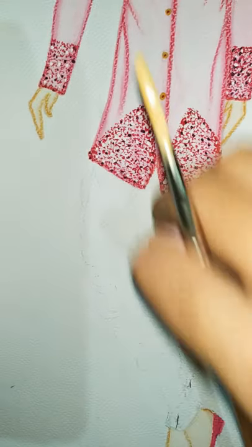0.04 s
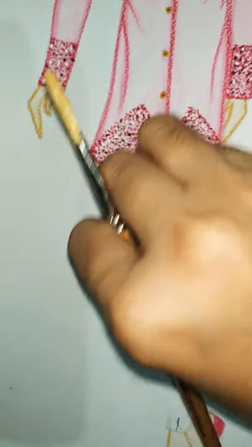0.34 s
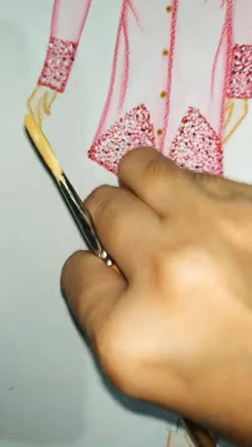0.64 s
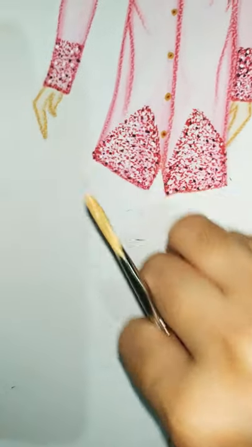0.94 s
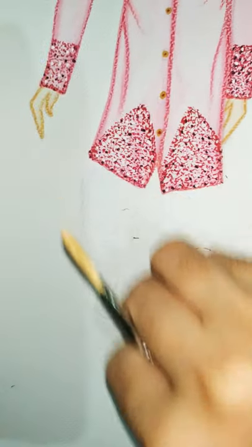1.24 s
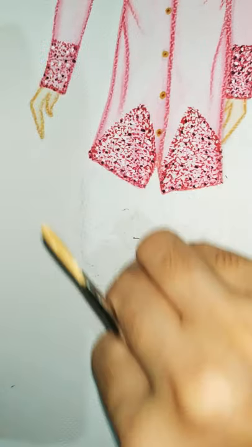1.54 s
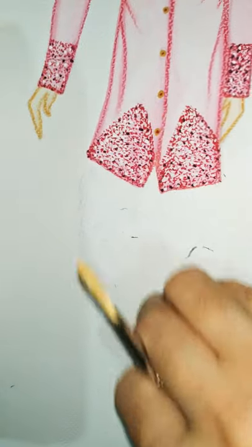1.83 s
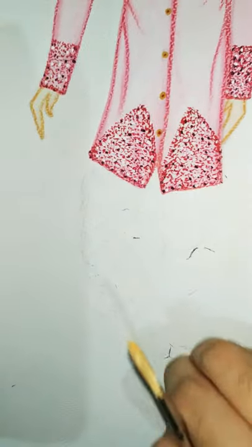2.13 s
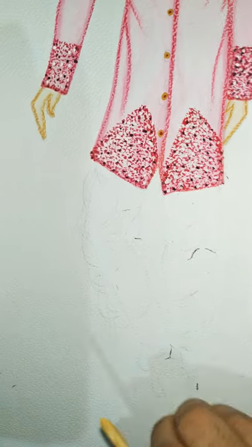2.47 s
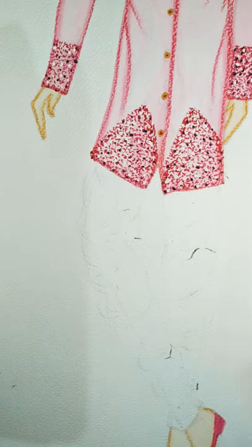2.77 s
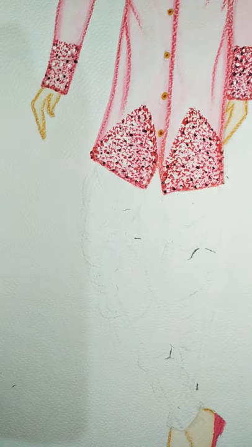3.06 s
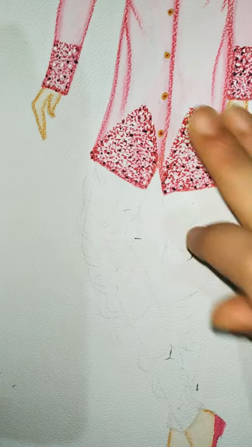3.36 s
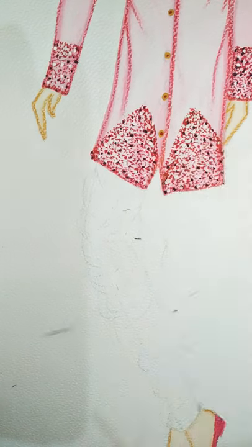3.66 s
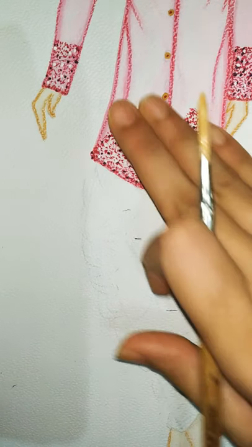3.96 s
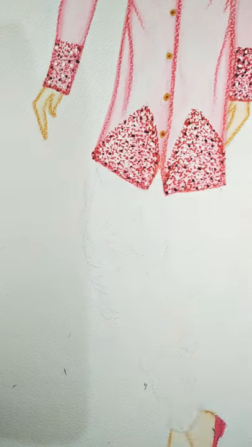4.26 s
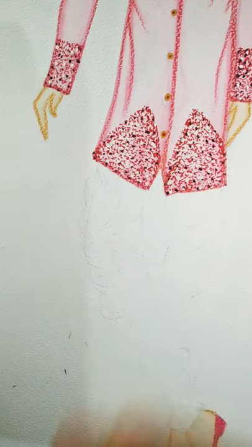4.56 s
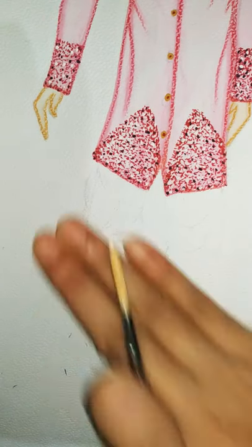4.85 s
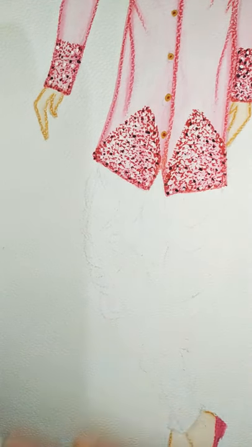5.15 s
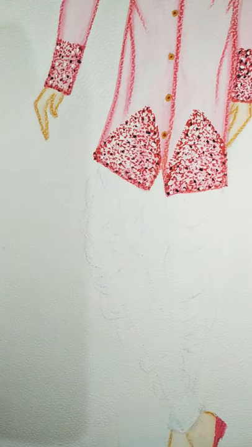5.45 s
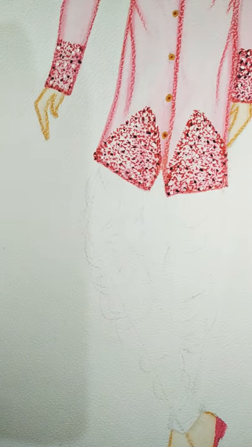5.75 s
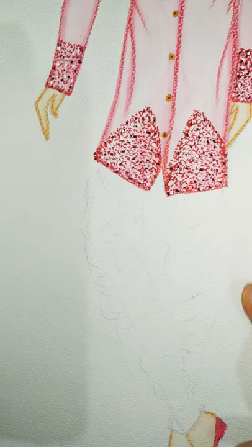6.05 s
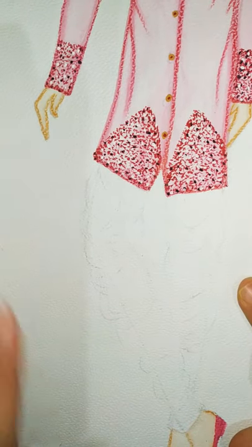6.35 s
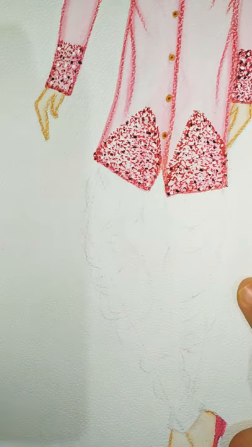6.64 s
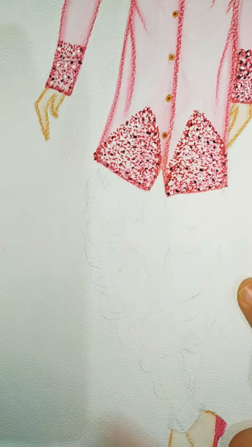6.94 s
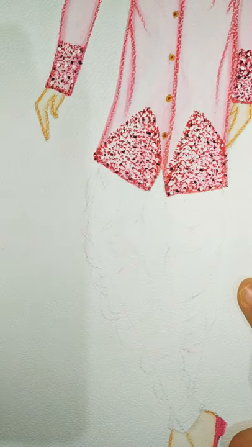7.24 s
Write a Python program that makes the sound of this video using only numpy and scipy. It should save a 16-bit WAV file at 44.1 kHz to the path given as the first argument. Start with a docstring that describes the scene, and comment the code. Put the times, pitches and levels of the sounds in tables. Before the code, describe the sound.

Close up at a desk in a small room, a small dry paintbrush flicks over paper, whispering on light strokes and scraping on harder ones. Fingers then wipe the sheet in eight quick, louder swishes, landing with soft bumps. Toward the end the hand slides and knocks, making the desk ring briefly. Dry ticks come and go over a low rumble and faint, wavering tones.

```python
"""At a desk in a small room, close up: a small dry paintbrush flicks crumbs off a drawing.
Its bristles whisper on light strokes and scrape on hard ones. Then fingers wipe the sheet in eight
quick swishes of skin on paper, landing with soft bumps; the hand slides and knocks, ringing the desk.
Brush and paper give off dry ticks. The room rings briefly over a low rumble and faint, wavering tones."""
import sys
import numpy as np
from scipy import signal
from scipy.fft import rfft, irfft, next_fast_len
from scipy.io import wavfile
from scipy.ndimage import map_coordinates

SR = 44100
rng = np.random.default_rng(int(sys.argv[2]) if len(sys.argv) > 2 else 0)


def inscribe(sig):
    """Save sig as 16-bit PCM at rate SR to the path in sys.argv[1].

    A 1-D sig is mono; a 2-D sig holds one channel per row.
    Samples are clipped to [-1, 1] before scaling.
    """
    pcm = np.round(np.clip(np.atleast_2d(sig).T, -1, 1) * 32767)
    wavfile.write(sys.argv[1], SR, pcm.astype(np.int16))


N = 330750  # 7.5 s


def amp(db):
    """Decibels to gain."""
    return 10 ** (np.asarray(db) / 20)


def unit(x):
    """Scale to rms 1."""
    return x / np.sqrt(np.mean(x ** 2) + 1e-20)


def along(points, hz):
    """Read a curve of (f/Hz, value) points on a log frequency axis."""
    f, value = np.transpose(points)
    return np.interp(np.log(hz + 1), np.log(f + 1), value)


def wobble(rate):
    """Smooth random modulation, with rate knots a second."""
    knots = rng.standard_normal(int(N * rate / SR) + 4)
    return map_coordinates(knots, [np.arange(N) * rate / SR])


def arch(length):
    """A half-sine swell from 0 to 1 and back over length seconds."""
    return np.abs(np.sin(np.linspace(0, np.pi, max(int(length * SR), 8))))


def filtered(x, response):
    """Zero-phase EQ; response gives the gain at each frequency."""
    size = next_fast_len(len(x) + SR // 4)
    return irfft(rfft(x, size) * response(np.fft.rfftfreq(size, 1 / SR)), size)[:len(x)]


def coloured(x, eq):
    """Shape x with an EQ curve and scale it to rms 1."""
    return unit(filtered(x, lambda hz: amp(along(eq, hz))))


def add(track, s, sound):
    """Mix a sound into the track at s seconds."""
    span = track[round(s * SR):][:len(sound)]
    span += sound[:len(span)]


# EQ of the room tone's low, mid and high layers: f/Hz, level/dB
RUMBLE_EQ = [(12, -35), (20, -0.5), (74, -4.5), (97, -6.5), (196, -8.5), (260, -18.5), (359, -11),
             (440, -43), (584, -40), (1360, -33), (2500, -46.5), (3250, -78), (5500, -120)]
WASH_EQ = [(250, -3.5), (500, 0.5), (950, -8), (1500, -12.5), (3000, -18), (6000, -23)]
HISS_EQ = [(1500, -2.5), (2500, 5.5), (3200, 3), (4500, 4), (6500, 0.5), (7500, 4), (9400, 5.5), (11000, 2),
           (15800, -4.5)]
# Fader ride of the mid wash, before its trim: t/s, level/dB
WASH_RIDE = [(0.0, -72), (0.88, -69.5), (3.24, -69), (3.55, -64), (5.8, -66), (6.18, -66.5), (7.5, -68)]
def room_tone(rumble_db=-56.3, wash_trim_db=0.5, hiss_db=-73.0):
    """The bed: a low rumble, a slowly drifting midrange wash and faint microphone hiss."""
    ride_db = np.interp(np.arange(N) / SR, *np.transpose(WASH_RIDE))
    rumble = amp(rumble_db + 1.1 * wobble(7)) * coloured(rng.standard_normal(N), RUMBLE_EQ)
    wash = amp(ride_db + wash_trim_db) * coloured(rng.standard_normal(N), WASH_EQ)
    hiss = amp(hiss_db) * coloured(rng.standard_normal(N), HISS_EQ)
    return rumble + wash + hiss


# Faint distant tones: start t/s, length/s, level/dB, crest f/Hz
TONE_CUES = [(3.66, 0.47, -63.5, 587), (5.08, 0.27, -64, 601), (5.68, 0.43, -57, 199.6)]
def far_tones(sag=0.1313, waver=0.017):
    """Each tone swells and bends up to its pitch, wavering, then sags as it fades."""
    track = np.zeros(N)
    for s, length, db, pitch_hz in TONE_CUES:
        swell = arch(length)
        hz = pitch_hz * (1 - sag * (1 - swell) + waver * wobble(73)[:len(swell)])
        add(track, s, amp(db) * np.sqrt(swell) * np.sin(2 * np.pi * np.cumsum(hz) / SR))
    return track


# Reverb time of the small room: f/Hz, T60/s
ROOM_DECAY = [(100, 0.5), (1000, 0.33), (5000, 0.35), (10000, 0.33), (16000, 0.23)]
def room_reverb(x, wet_db, build_up_s=0.0014, morph_hz=1.3):
    """Each band dies away at its own speed; the moving hand keeps changing the echo pattern."""
    hz, t, noise = signal.stft(rng.standard_normal((2, int(SR * .7))), SR, nperseg=256)
    decay = amp(-60 * t / along(ROOM_DECAY, hz)[:, None]) * (1 - np.exp(-t / build_up_s))
    tails = signal.istft(noise * decay, SR, nperseg=256)[1]
    tails /= np.linalg.norm(tails[0])
    angle = 2 * np.pi * morph_hz * np.arange(N) / SR
    sends = x * [np.cos(angle), np.sin(angle)]  # crossfade between the two tails
    return amp(wet_db) * signal.fftconvolve(sends, tails, axes=1).sum(axis=0)[:N]


def early_echoes(x, echo_db, earliest_s=0.00093, latest_s=0.0044, count=5):
    """Quick reflections off the hand and things on the desk comb-filter the sound."""
    track = x.copy()
    for delay, polarity in zip(rng.uniform(earliest_s, latest_s, count), rng.choice([-1, 1], count)):
        add(track, delay, amp(echo_db) * polarity * x)
    return track


# Dry ticks of brush and paper: t/s, level/dB, centre f/Hz
TICK_CUES = [(1.58, -55, 2200), (2.745, -52, 9000), (2.803, -45, 10800), (2.926, -46, 1300),
             (3.076, -51, 5700), (3.307, -41.5, 5500), (6.124, -38.5, 5130), (7.247, -42, 11500),
             (7.363, -49, 5500), (7.393, -51.5, 4000), (7.425, -54, 3500)]
def ticks(t60=0.025, octaves=0.93):
    """Tiny snaps of noise, each bright around its own pitch."""
    track, t = np.zeros(N), np.arange(SR // 20) / SR
    for s, db, centre_hz in TICK_CUES:
        noise = rng.standard_normal(len(t))
        snap = filtered(noise, lambda hz: 1 / (1 + (np.log2((hz + 1) / centre_hz) / octaves) ** 2))
        add(track, s, amp(db - 60 * t / t60) * unit(snap))
    return track


def friction(eq, snags_per_s, grain_db, uneven_db):
    """Rubbing on paper: smooth hiss plus the grain of snagging fibres, under uneven pressure."""
    snags = (rng.random(N) < snags_per_s / SR) * rng.standard_normal(N)
    rub = coloured(rng.standard_normal(N) + amp(grain_db) * unit(snags), eq)
    return unit(rub * amp(uneven_db * wobble(110)))


def stroke(s, length, rub, swell_power, hollow, max_delay_s=.0006):
    """Contact swells and fades; a reflection off the sheet hollows out the rub."""
    swell = arch(length)
    direct = np.take(rub, round(s * SR) + np.arange(len(swell)), mode="wrap")
    lag = int(rng.uniform(.3, 1) * max_delay_s * SR) + 1  # set by the height above the sheet
    return swell ** swell_power * unit(direct + hollow * np.roll(direct, lag))


# EQ of the hand's rasp: f/Hz, level/dB
PALM_EQ = [(240, -40), (400, -10), (707, -8), (1020, 0.5), (1100, -6.5), (1350, -5), (1650, -14.5),
           (2140, -3.5), (2380, -10.5), (3190, -13), (4210, -3.5), (4550, -5.5), (6380, -14.5),
           (10300, -10.5), (15800, -25)]
# Hand slides: start t/s, length/s, relative level/dB
SLIDE_CUES = [(2.475, .045, -55.5), (3.38, .09, -54.5), (3.48, .12, -57), (4.017, .045, -55),
              (4.092, .04, -51), (4.28, .08, -59), (6.045, .125, -54), (6.155, .078, -48.5)]
def hand_slides():
    """The side of the hand shifts over the sheet with a hollow rasp."""
    palm = friction(PALM_EQ, snags_per_s=1200, grain_db=-4, uneven_db=1.6)
    track = np.zeros(N)
    for s, length, db in SLIDE_CUES:
        add(track, s, amp(db) * stroke(s, length, palm, swell_power=.45, hollow=0.23))
    return track


# EQ of the airy bristle tips and of their gritty scrape: f/Hz, level/dB
TIPS_EQ = [(300, -5), (1100, 1), (1650, -13), (2150, 2.5), (2700, -18.5), (3650, -4), (4250, 0),
           (5900, -2.5), (6900, -7), (8500, -5.5), (10400, 2.5), (11500, -6.5), (12700, -5.5), (15800, -16)]
GRIT_EQ = [(100, -3.5), (350, -3.5), (680, -4), (980, 5.5), (1300, -1), (1650, -9.5), (2130, -2),
           (2750, -10), (3700, -8.5), (4400, -4), (6000, -9), (7200, -16), (10000, -11), (15800, -24)]
# Stretches where the tips keep grazing the sheet: start t/s, end t/s, relative level/dB
GRAZE_CUES = [(.7, 2, -71), (2.4, 3.5, -69)]
# Brush strokes: start t/s, length/s, relative level/dB
BRUSH_CUES = [(0.356, 0.051, -66), (0.483, .045, -63.5), (0.599, 0.09, -60), (.84, .035, -44),
              (0.861, .12, -57.5), (1.073, 0.024, -44.5), (1.136, .032, -47.5), (1.225, 0.1, -62),
              (1.416, 0.079, -62.5), (1.575, 0.13, -60.5), (1.763, .017, -47.5), (1.82, 0.021, -45.5),
              (1.895, .125, -55), (1.997, 0.011, -44.5), (2.085, .046, -60.5), (2.193, 0.087, -57.5),
              (2.332, .033, -61), (2.425, .04, -64), (2.566, 0.036, -60.5), (2.665, 0.036, -64.5),
              (3.003, 0.022, -62), (3.075, .04, -62), (3.14, .078, -57), (3.303, .045, -46.5)]
def brushing(grazes_per_s=11, gritty_from_db=-55, knee_db=2.2):
    """Bristle tips whisper to and fro over the sheet; harder strokes are darker and grittier."""
    tips = friction(TIPS_EQ, snags_per_s=2400, grain_db=-4, uneven_db=2.0)
    grit = friction(GRIT_EQ, snags_per_s=1200, grain_db=-3, uneven_db=0.5)
    t = np.arange(N) / SR
    swing = np.sin(np.pi * grazes_per_s * t + 0.88 * wobble(4)) ** 2
    grazing = sum(amp(db) * ((t > start) & (t < end)) for start, end, db in GRAZE_CUES)
    track = tips * swing * grazing
    for s, length, db in BRUSH_CUES:
        grit_mix = 1 / (1 + np.exp((gritty_from_db - db) / knee_db))
        rub = np.sqrt(1 - grit_mix) * tips + np.sqrt(grit_mix) * grit
        add(track, s, amp(db) * stroke(s, length, rub, swell_power=0.39, hollow=.36))
    return track


# EQ of the skin's hiss and of its low drag when pressed: f/Hz, level/dB
SKIN_EQ = [(880, -25.5), (1500, -18), (1580, -18), (1860, -19), (2220, -11.5), (2710, -17), (2960, -12.5),
           (3750, -9), (5040, -2.5), (7400, -5), (10400, 2.5), (15000, -7), (15800, -9)]
DRAG_EQ = [(50, 10.5), (130, 12.5), (330, -2), (650, -4.5), (950, 4), (1550, -10.5), (2250, -4.5),
           (2800, -8.5), (4300, -9), (6000, -32), (9000, -74), (15000, -29)]
# Finger wipes: landing t/s, fastest t/s, lift t/s, landing speed (0-1),
# relative hiss level/dB, relative drag level/dB, treble tilt/dB, landing thud level/dB
WIPE_CUES = [(3.512, 3.636, 3.706, 0.01, -34.5, -52.5, 0, -62),
             (4.081, 4.157, 4.272, .24, -31.5, -54, -0.1, -58),
             (4.539, 4.615, 4.68, 0.35, -32.7, -53.5, 1, -32),
             (4.956, 5.039, 5.123, 0.15, -30.5, -50, -1, -37),
             (5.342, 5.431, 5.486, .28, -32, -54, 1, -32.5),
             (5.651, 5.715, 5.76, 0.25, -33.5, -55, .8, -38.5),
             (6.462, 6.553, 6.672, .0, -28.8, -41.5, -1.5, -27),
             (6.919, 6.984, 7.062, .55, -32.5, -37.8, 0, -23.5)]
def finger_wipes(pressing_db=4.2, brightening_db=2.5, roll_db=1.0, split_hz=8000):
    """Fingers land, speed up and lift off; as the pressure eases the drag fades and the hiss thins."""
    skin = friction(SKIN_EQ, snags_per_s=5000, grain_db=-6.5, uneven_db=1.42)
    sheen = filtered(skin, lambda hz: 1 / (1 + (split_hz / (hz + 1)) ** 6))
    dull_gain, sheen_gain, drag_gain = np.zeros((3, N))
    for land, fastest, lift, landing_speed, hiss_db, drag_db, treble_db, _ in WIPE_CUES:
        t = np.arange(land, lift, 1 / SR)
        phase = np.interp(t, [land, fastest, lift], [np.arcsin(landing_speed), np.pi / 2, np.pi])
        speed = np.abs(np.sin(phase))
        pressure = np.linspace(1, -1, len(t))  # hardest on landing
        tilt_db = treble_db - brightening_db * pressure
        swish = speed ** 2.05
        add(dull_gain, land, amp(hiss_db - tilt_db) * swish)
        add(sheen_gain, land, amp(hiss_db + tilt_db) * swish)
        add(drag_gain, land, amp(drag_db + pressing_db * pressure) * speed ** .8)
    roll = amp(roll_db * wobble(45))  # the fingers roll, trading dull hiss for bright
    drag = friction(DRAG_EQ, snags_per_s=700, grain_db=-6, uneven_db=5)
    return dull_gain / roll * (skin - sheen) + sheen_gain * roll * sheen + drag_gain * drag


def soft_hits(finger_gap_s=.0095, finger_soft_s=.0014, brush_soft_s=.0045, slap_db=-9, push_db=3):
    """Hits for the desk: two fingers land in turn on each wipe; the brush presses as each stroke ends."""
    fingers = [(land + delay, db + drop_db, finger_soft_s, db + drop_db + slap_db)
               for land, *_, db in WIPE_CUES for delay, drop_db in [(0, 0), (finger_gap_s, -1)]]
    brush = [(s + length, db + push_db, brush_soft_s, -np.inf) for s, length, db in BRUSH_CUES]
    return fingers + brush


# Resonances of the desk: f/Hz, bandwidth/Hz, relative level/dB
DESK_MODES = [(60, 18, -5.5), (123.5, 44, 3.5), (176, 62, -3), (288.7, 72, -2), (484, 64, -4),
              (850, 28, 1.5), (918, 39, 2.5), (1003, 66, -1), (1220, 54, -7), (1815, 13, 2),
              (2280, 40, -25)]
# EQ of the sheet slapping the wood: f/Hz, level/dB
SLAP_EQ = [(100, 9), (900, 3.5), (1600, -9.5), (4500, -3), (7000, -12), (10000, -7.5), (15800, -25)]
# Hand knocks: t/s, peak level/dB, contact softness/s, slap level/dB
KNOCK_CUES = [(2.924, -37, .00055, -46), (5.467, -37.5, 0.00059, -57), (6.111, -35, .0004, -49),
              (6.229, -14.3, .0005, -34), (6.599, -26.5, 0.0006, -47), (6.985, -13.3, .00054, -52),
              (7.363, -36.5, 0.0013, -60), (7.394, -39.5, .0016, -55)]
def desk_knocks(slap_t60=0.036):
    """Each hit rings the desk, duller when it is soft; hand and fingers also slap the sheet on the wood."""
    t = np.arange(SR // 4) / SR
    ring = sum(amp(db) * width * np.exp(-np.pi * width * t) * np.cos(2 * np.pi * hz * t)
               for hz, width, db in DESK_MODES)
    knocks, slap_gain = np.zeros((2, N))
    for s, db, softness, slap_db in list(KNOCK_CUES) + soft_hits():
        force = t * np.exp(-2 * t / softness)
        knock = signal.fftconvolve(force, ring)[:len(t)]
        add(knocks, s, -amp(db) * knock / np.abs(knock).max())
        add(slap_gain, s, amp(slap_db - 60 * t / slap_t60))
    return knocks + slap_gain * coloured(rng.standard_normal(N), SLAP_EQ)


def scene():
    """Mono mix: brush, hand and desk up front, with a little reverb, over the bed."""
    rubbing = brushing() + hand_slides() + finger_wipes()
    foley = amp(-1.0) * early_echoes(rubbing, echo_db=-23.5) + desk_knocks() + ticks()
    return (foley + room_reverb(foley, wet_db=-11.5) + room_tone() + far_tones())[None]


def record(dry):
    """A brick-wall high cut on the master."""
    cutoff_hz = 15850
    return np.array([filtered(channel, lambda hz: 1 / (1 + (hz / cutoff_hz) ** 300)) for channel in dry])


dry = scene()
out = record(dry)
inscribe(out)
```